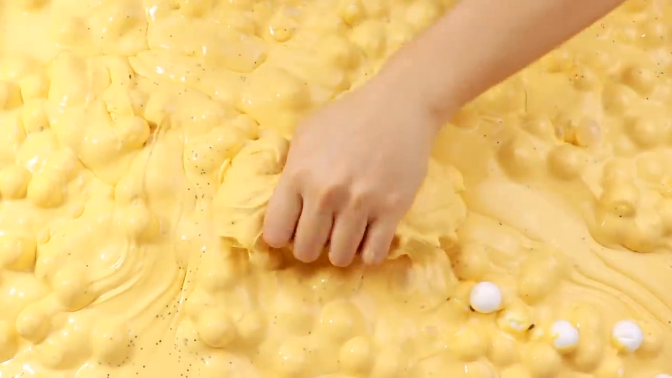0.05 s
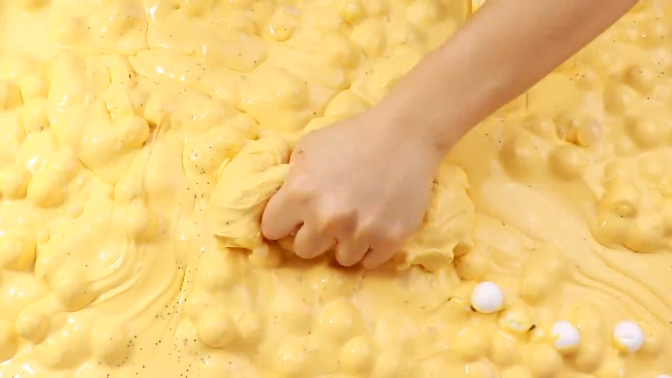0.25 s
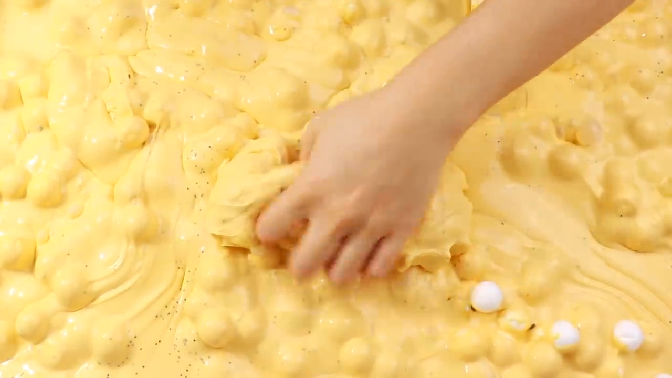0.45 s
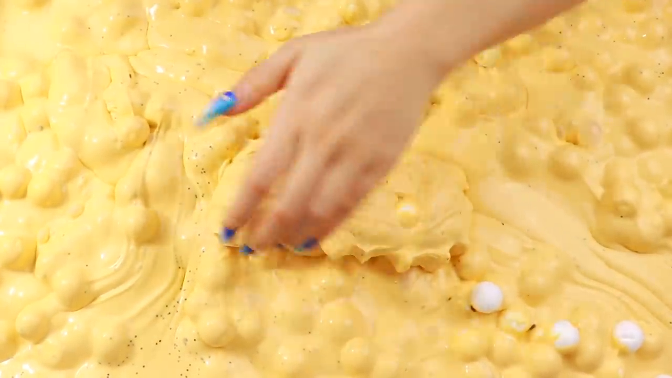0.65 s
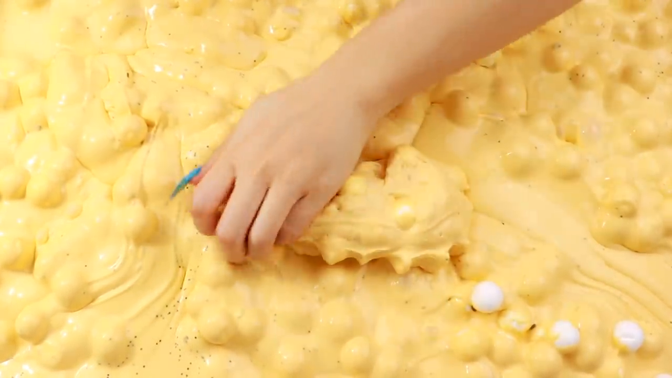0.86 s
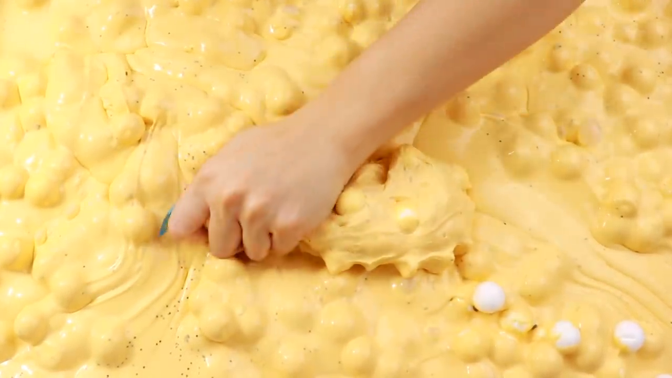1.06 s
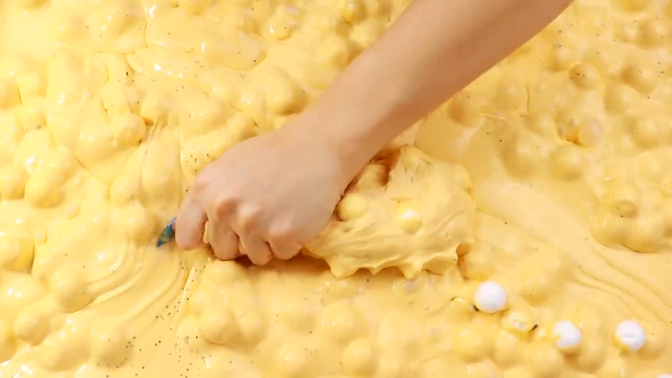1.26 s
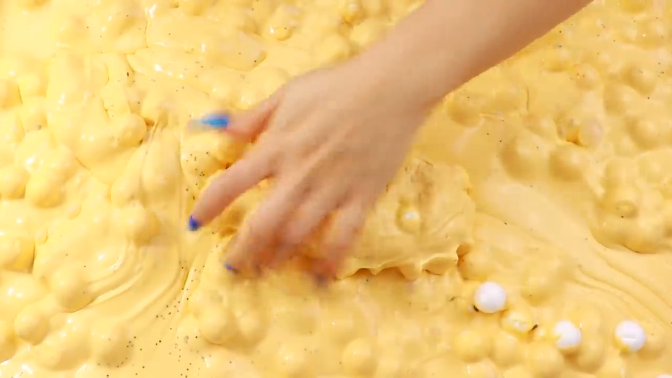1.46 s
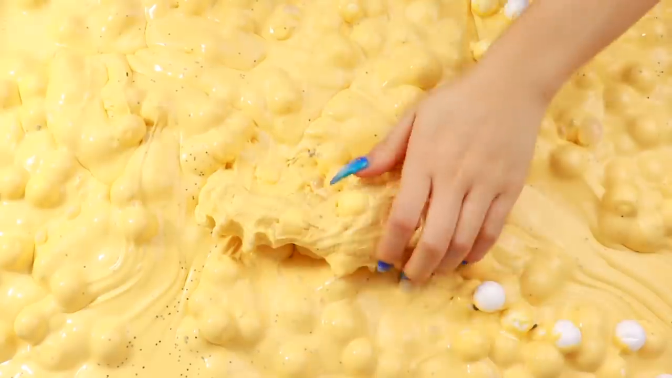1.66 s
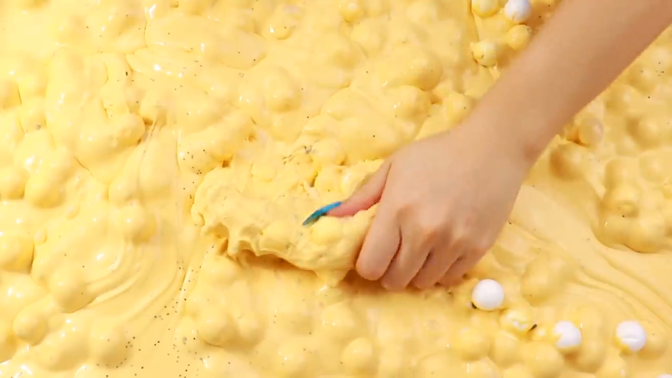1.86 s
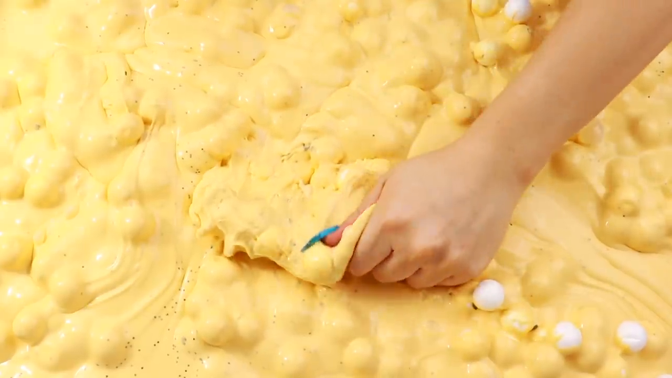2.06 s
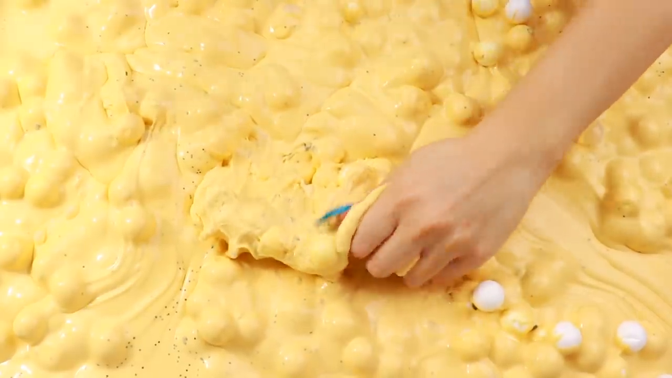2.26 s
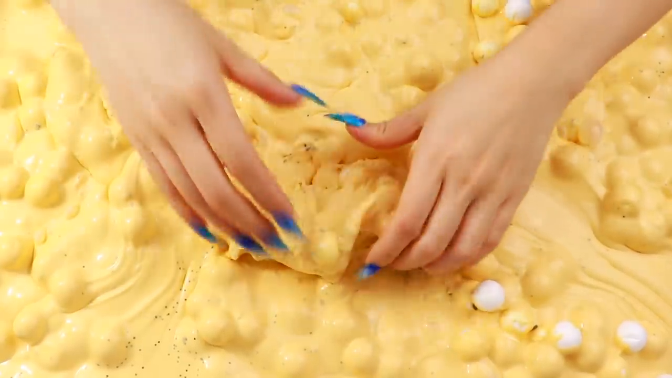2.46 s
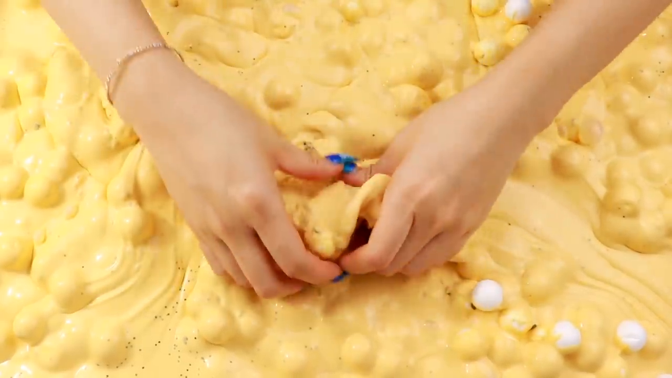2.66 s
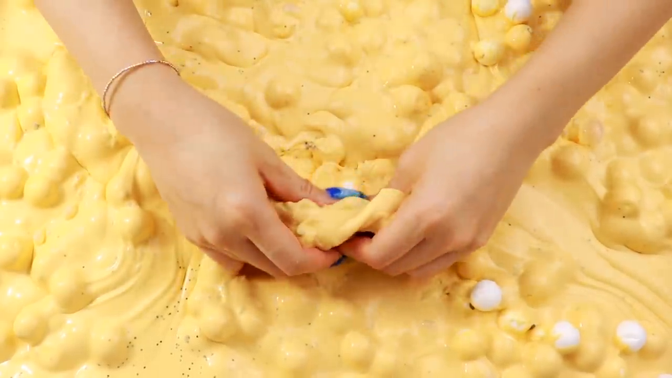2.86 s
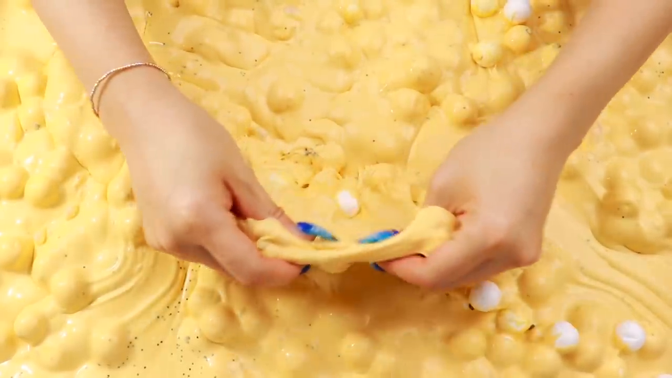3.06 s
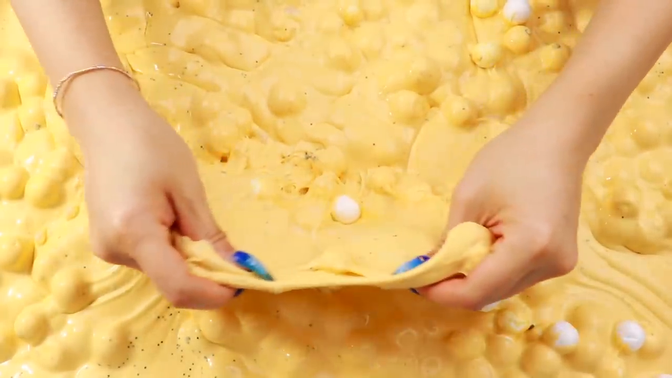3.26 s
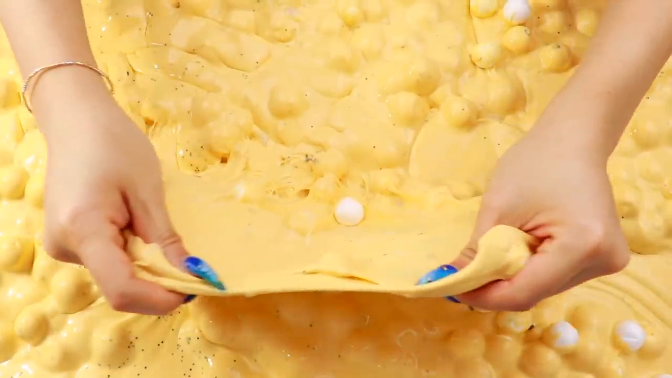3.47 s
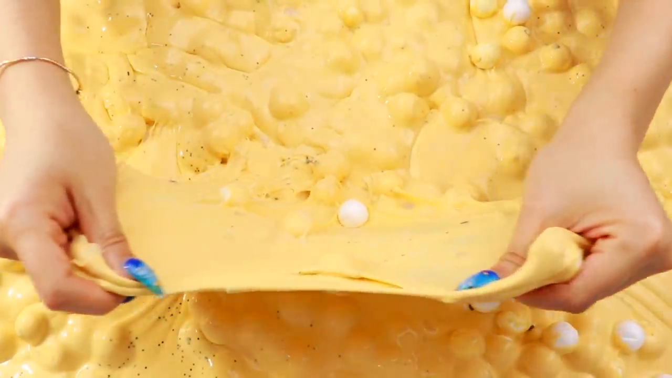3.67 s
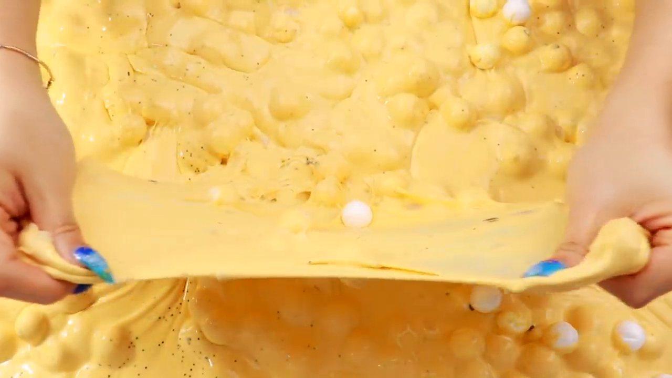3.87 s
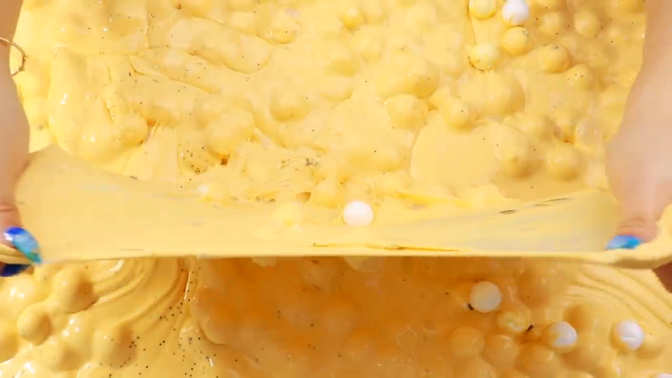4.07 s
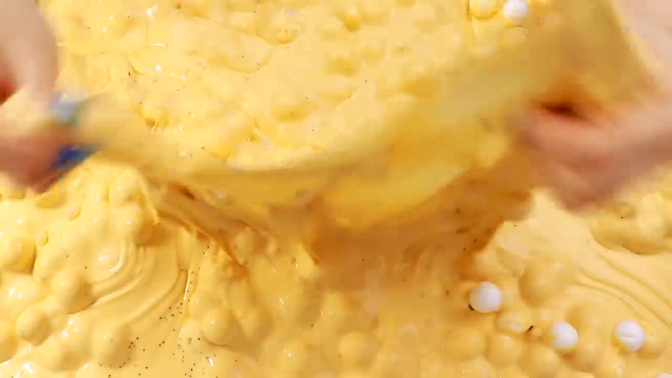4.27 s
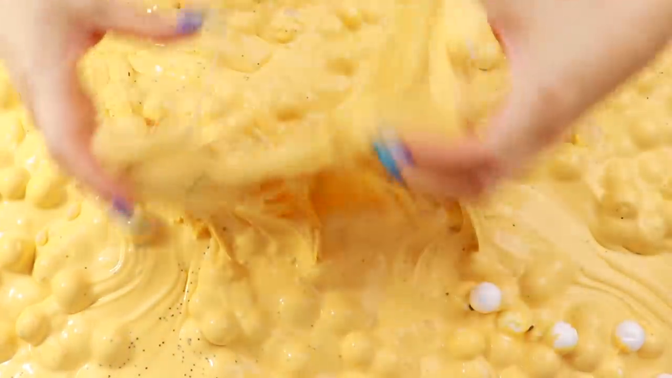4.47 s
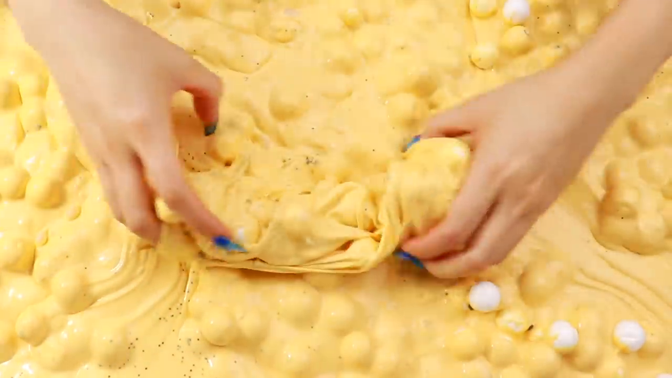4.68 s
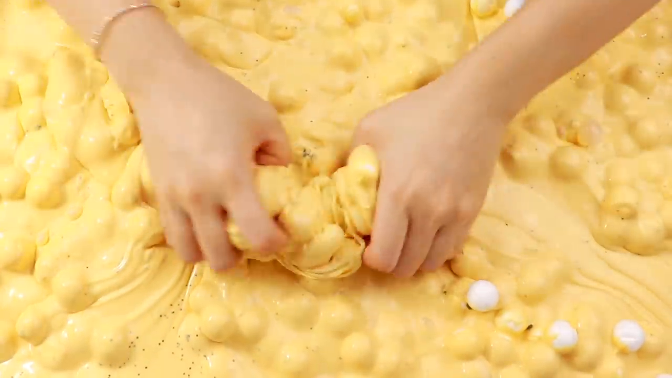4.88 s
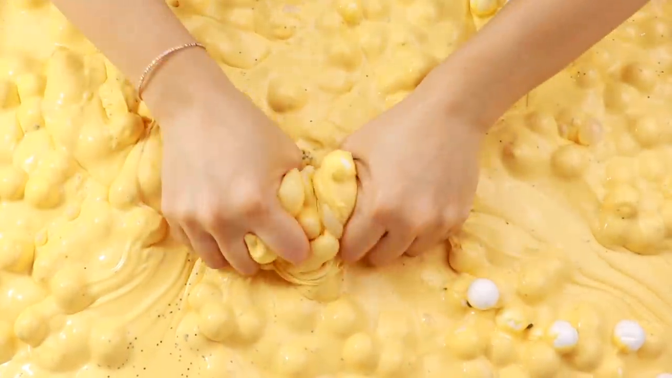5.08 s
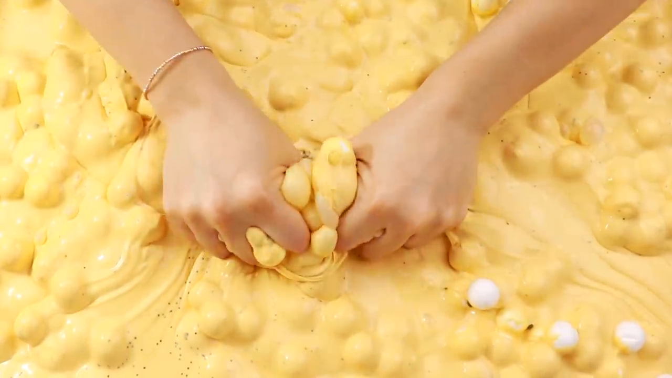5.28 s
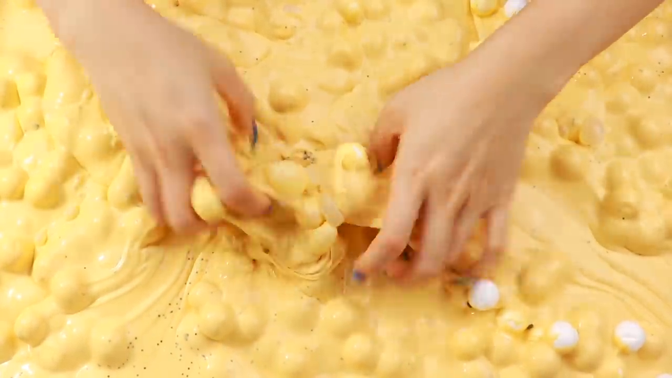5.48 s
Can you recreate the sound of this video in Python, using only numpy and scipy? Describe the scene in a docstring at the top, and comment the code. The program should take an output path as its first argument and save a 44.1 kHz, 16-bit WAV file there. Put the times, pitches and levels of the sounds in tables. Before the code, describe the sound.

Hands squeeze thick bead-filled slime close up: sharp irregular pops, wet squelching crackle, a quiet stretch, then another burst of crunchy popping.

```python
"""Small room, close microphone, table: hands squeeze, stretch and knead thick bead-filled slime.
Bursting air pockets: decaying noise through resonators. Squelch, fizz and peels: clumped grains ringing briefly.
Squeezed air squeaks as short rising tones; walls return a noise tail.
Low handling rumble, background noise and a wavering hum are shaped noise; a faint whine is a sine."""
import sys
import numpy as np
from scipy import signal
from scipy.fft import rfft, irfft, next_fast_len
from scipy.io import wavfile

SR = 44100
rng = np.random.default_rng(int(sys.argv[2]) if len(sys.argv) > 2 else 0)


def file_out(sig):
    """Save sig as 16-bit WAV at sys.argv[1]."""
    # one column per channel
    cols = np.atleast_2d(sig).T
    # limit, then scale
    lim = np.clip(cols, -1, 1)
    pcm = np.round(lim * 32767).astype(np.int16)
    wavfile.write(sys.argv[1], SR, pcm)


N = 243873
T_S = np.arange(N) / SR

# Hands gripping or pulling the mass: (start [s], end [s], coarse squelch level [dB], fine fizz level [dB])
GRIPS = [(0, 0.29, -49, -54), (0.84, 1.234, -53.5, -56), (1.733, 2.133, -52, -59.5),
         (2.563, 3.035, -55.5, -56), (3.21, 3.628, -67, -63.5), (3.823, 3.87, -78.5, -74),
         (4.336, 4.379, -74, -64.5), (4.48, 4.53, -59.5, -71), (4.7, 4.86, -59.5, -66),
         (4.887, 5.22, -45.5, -52)]
# Squelch spectrum: (frequency [Hz], relative gain [dB])
SQUELCH_SPECTRUM = [(150, -5), (400, -1), (1000, 5), (2000, 3.5), (3500, -2), (6000, -37.5)]
# Fizz spectrum: (frequency [Hz], relative gain [dB])
FIZZ_SPECTRUM = [(1200, -24.5), (2500, -6), (4000, -3), (7000, -3.5), (11000, -1.5), (16000, -2.5)]
# Air pockets bursting: (time [s], peak [dB], pocket pitch [Hz], length scale [ms], plop against pop [dB])
POPS = [(.0008, -8.5, 2310, 0.16, 28), (0.0143, -14, 12400, .35, -2), (0.0353, -6, 11100, 0.63, -10.5),
        (0.0427, -17, 5040, 0.36, -15), (0.0553, -19.5, 5500, 0.065, 13), (0.095, -10.5, 14000, .26, -37),
        (.101, -10, 10900, 0.78, -36), (.118, 1.5, 9900, 0.92, -7.5), (.1354, 4.5, 12400, 0.21, -5.5),
        (0.156, -13, 8000, .27, -21), (0.1607, 0, 7000, 0.34, -43), (.1667, -11, 5970, .3, -4),
        (0.1698, -15, 7000, 0.35, -14), (0.199, -10.5, 12980, 2.2, -5), (.2075, -15.5, 6660, 0.88, -11),
        (0.2347, 16.5, 8200, .63, -11.5), (0.265, 13, 7900, 0.57, -3.5), (0.2953, -27, 11000, 0.39, -24),
        (0.3893, -12.5, 3000, .18, -27), (0.4084, -12, 6300, 0.25, -26), (.425, -11, 2260, 0.6, -8.5),
        (.7054, -11.5, 5400, 0.19, -22.5), (.7219, -21.5, 3750, 0.11, -23), (0.724, -17.5, 9840, 0.22, -15),
        (0.7857, -30, 8400, .18, -26), (0.8574, -18.5, 3600, 0.61, -34), (0.8616, 4.5, 9300, 0.22, -9.5),
        (0.868, -5, 3400, .4, -28), (.8749, -2, 3550, 0.16, -19), (0.9043, -26, 1200, .8, -10.5),
        (0.919, -29, 1200, .8, -11), (.9506, -25.5, 1170, 0.87, -14), (.9637, -21, 2830, 0.44, -23),
        (0.9714, -11.5, 5550, 0.092, -6), (1.0039, -18, 1790, 1.3, 8), (1.0279, -12, 9620, 0.2, -3),
        (1.0376, -22.5, 11610, 0.13, -19.5), (1.048, -13, 9040, 0.14, -21), (1.0575, -5.5, 9250, 4.7, -25),
        (1.0591, -5.5, 12000, 2.6, 5.5), (1.0945, -28, 4240, 0.2, -14), (1.1072, -22, 13150, 1.1, -3),
        (1.1206, -15.5, 10400, .12, -22), (1.1411, -18.5, 13150, 0.46, -13), (1.171, 3.5, 9400, 1.4, -25.5),
        (1.2139, -20, 11400, 1, -23), (1.2744, -24.5, 9400, 0.22, -14), (1.3855, -26, 2930, 0.74, -24),
        (1.4022, -13.5, 1790, 0.59, -3.5), (1.695, -17, 1950, .2, 20.5), (1.7362, -19, 4300, .7, 1),
        (1.751, -17.5, 1690, 0.21, 1), (1.801, -10, 2720, 0.13, 7), (1.838, -19.5, 7950, 1.5, 0.5),
        (1.8671, -24, 870, 1.7, -22), (1.8846, -21, 4400, 0.11, 9), (1.9025, -20, 7360, .26, -8),
        (1.9415, 0, 10000, .15, -11.5), (1.9624, -6, 12350, 0.054, -37), (2.0032, 5, 6800, 0.56, -47),
        (2.1395, -8, 3600, 0.19, 4.5), (2.2798, -20.5, 8700, 0.4, -9), (2.304, -14, 10760, .12, -3.5),
        (2.5732, -21, 10370, 0.31, -25.5), (2.581, -32, 11200, .12, -23), (2.6064, -27, 13200, 1, -21),
        (2.6212, -18, 11610, 0.82, -4), (2.6433, -19.5, 4330, 0.27, 3), (2.6883, -17.5, 8350, 0.45, -12),
        (2.724, -24.5, 3960, 1.1, 19), (2.7633, -14, 3530, 0.07, -19), (2.7677, -18.5, 3700, 0.39, -3),
        (2.779, -23, 7260, 3.2, -11), (2.7899, -13.5, 8000, 2.9, -19), (2.872, -23.5, 8600, 3.9, -10),
        (2.9398, -24, 1500, 6.5, -1), (2.95, -19, 970, 1.9, -8), (2.9613, -14, 13400, 0.09, -32),
        (3.0271, -17.5, 11300, 1.07, -12.5), (3.1432, -28, 13400, 3.9, -22), (3.1541, -27, 7200, 2.1, -4),
        (3.287, -43.5, 3060, 2.1, -16), (3.325, -39, 6430, 0.81, -11), (3.406, -33, 1324, 0.54, -8.5),
        (3.471, -38, 1010, 0.9, -13), (3.4844, -33, 2950, 1.7, 21), (3.5062, -24, 2600, 0.25, -2),
        (3.573, -36, 4260, 2, -32), (3.617, -27, 8600, 0.37, -22), (3.6488, -43, 778, 1.5, -5),
        (3.72, -50, 2510, .5, -5), (3.826, -48.5, 4074, 1.3, -14.5), (3.9122, -43, 2565, 1.9, 0),
        (3.915, -47.5, 447, 2.1, -12), (4.003, -52, 650, 1.1, -6), (4.118, -53.5, 1795, 1, -1),
        (4.228, -34, 2670, 2.1, -22), (4.259, -29, 4960, 1, -17.5), (4.28, -25.5, 8700, 1.1, -28),
        (4.5248, -13, 13100, 1.07, -24), (4.6542, -45, 3260, 0.61, -11), (4.681, -39.5, 3340, 0.61, 11),
        (4.712, -36.5, 3700, 1.3, 6), (4.7298, -15.5, 6070, 0.39, -20), (4.755, -42, 1090, 2.7, 5),
        (4.79, -21, 790, 0.76, -3), (4.7978, -12, 10900, 0.11, -45), (4.816, -31, 3030, 2.2, 6),
        (4.8528, -29, 9040, 2.3, -21), (4.8757, 4.5, 2770, 1.83, -11), (4.9013, -8, 890, 1.1, 2),
        (4.9247, -5.5, 3570, 0.36, -15), (4.9552, -15.5, 1540, 1.1, 0), (4.9843, -18.5, 1100, 1.9, 1),
        (5.0, -14, 523, 0.42, -5.5), (5.0045, -16, 1850, 4.5, 3), (5.017, -10, 5700, 0.45, -15),
        (5.025, -6.5, 12100, 0.77, -38), (5.0352, -12.5, 3620, 0.71, -14), (5.083, -25, 10900, .8, -15),
        (5.093, -17.5, 8950, 0.38, 0), (5.1238, 0, 8650, 0.2, -12), (5.133, -15, 6250, .95, -2),
        (5.1393, -6.5, 2680, 0.22, -10), (5.1498, -10.5, 13900, 0.3, -9), (5.1815, 5, 3260, 1.64, -6.5),
        (5.2103, -19, 5480, 1.8, 24), (5.2269, -18, 2420, 1.6, 2), (5.2546, -18, 3680, 0.27, -43),
        (5.397, -25, 2240, 1.9, -1), (5.432, -21.5, 1070, 0.52, -4), (5.487, -11, 8700, 0.19, -9)]
# Wall echo decay: (frequency [Hz], T60 [s])
WALL_T60 = [(300, .2), (1500, .18), (4000, .21), (8000, .22), (15000, .14)]
# Wall echo strength: (frequency [Hz], relative level [dB])
WALL_RETURN = [(300, -13), (1500, -10), (3500, 0), (8000, 0), (15000, -3)]
# Handling through the table: (time [s], level [dB])
RUMBLE_LEVEL = [(0.0, -61.5), (0.28, -45.5), (0.38, -66.5), (0.48, -39), (0.58, -60), (0.91, -47),
                (1.02, -62), (1.05, -45), (1.32, -67), (1.45, -44.5), (2.22, -64), (2.39, -46),
                (3.79, -59.5), (5.16, -48), (5.27, -65), (5.53, -38)]
# Table rumble spectrum: (frequency [Hz], relative gain [dB])
RUMBLE_SPECTRUM = [(15, 6.5), (35, -7.5), (60, -7.5), (130, -23), (250, -38.5)]
# Room and microphone noise spectrum: (frequency [Hz], relative gain [dB])
HUSH_SPECTRUM = [(88, -31), (150, -1), (222, -8), (378, -4.5), (1360, -15.5), (3930, -20), (4690, -23),
                 (11400, -22.5), (15300, -21.5), (16500, -39.5)]
# Skin or a slack sheet peeling off: (start [s], end [s], wet body level [dB], bright rustle level [dB])
PEELS = [(0.368, 0.517, -36.5, -38), (1.33, 1.481, -39.5, -38), (2.221, 2.405, -42.5, -44.5),
         (3.102, 3.19, -45.5, -51), (4.174, 4.345, -60.5, -48.5), (5.336, 5.56, -37.5, -37)]
# Wet peel body spectrum: (frequency [Hz], relative gain [dB])
BODY_SPECTRUM = [(70, 6.5), (200, 8.5), (500, 0), (1000, 4), (2000, 2.5), (3500, -66), (6000, -49)]
# Bright peel rustle spectrum: (frequency [Hz], relative gain [dB])
RUSTLE_SPECTRUM = [(1200, -13), (2500, -2), (4000, -7.5), (7000, -7), (11000, -7), (16000, -13.5)]
# Air squeezed through a narrow gap: (start [s], end [s], first pitch [Hz], last pitch [Hz], level [dB])
SQUEAKS = [(1.8, 1.826, 4200, 5320, -53), (3.12, 3.17, 560, 630, -50)]

GRIP_RISE_DB_PER_S, GRIP_FALL_DB_PER_S = 197.5, 149.5
REST_DB = (-86.5, -80.5)  # squelch, fizz: the mass settling by itself
AFTER_DB, AFTER_T60_S = (-43.5, -40), 0.16  # squelch, fizz: torn walls crackle after a burst
AFTER_SHARE = 0.85  # share of the burst's dB passed to the crackle
HUSH_DB = -68.5
WHINE_HZ, WHINE_DB = 4000, -87
HUM_HZ, HUM_WIDTH_HZ, HUM_DB = 127, 6, -72.5
SWELL_DB = 10  # peel edges lie this far below its middle
TUG_S, TUG_DB, LAST_TUG_S = 0.0646, 2.5, 0.019  # period, depth, last tug crest before the end
CUTOFF_HZ = 16900


def from_db(db):
    """Decibels to amplitude."""
    return 10 ** (np.asarray(db) / 20)


def rms_one(x):
    """Scales x to rms 1."""
    return x / np.sqrt(np.mean(x ** 2) + 1e-20)


def at_hz(points, hz):
    """Reads a table along log frequency."""
    table_hz, values = np.transpose(points)
    return np.interp(np.log(hz), np.log(table_hz), values)


def coloured(x, spectrum):
    """Filters x by a spectrum that falls to -60 dB an octave beyond its ends; rms 1."""
    size = next_fast_len(N)
    hz = np.arange(1, size // 2 + 2) * SR / size
    below, above = (spectrum[0][0] / 2, -60), (spectrum[-1][0] * 2, -60)
    closed = [below] + list(spectrum) + [above]
    gain = from_db(at_hz(closed, hz))
    return rms_one(irfft(rfft(x, size) * gain, size)[:N])


def resonance(x, hz, width_hz):
    """Two-pole resonance, gain 1 on top."""
    r = np.exp(-np.pi * width_hz / SR)
    feed = np.array([1, 0, -1]) * (1 - r * r) / 2
    back = [1, -2 * r * np.cos(2 * np.pi * hz / SR), r * r]
    return signal.lfilter(feed, back, x)


def resonance_pair(x, hz, width_hz):
    """Two equal resonances in series, for steeper skirts."""
    return resonance(resonance(x, hz, width_hz), hz, width_hz)


def drift(rate_hz):
    """Slow random wander: noise under a double low-pass, rms 1."""
    settle = 9000
    r = np.exp(-2 * np.pi * rate_hz / SR)
    slow = signal.lfilter([1], [1, -2 * r, r * r], rng.standard_normal(N + settle))
    return rms_one(slow[settle:])


def grains(per_s, clump_db, low_hz, high_hz, cycles, smooth):
    """Tiny strands snap in clumps, each ringing a few cycles at its own pitch, over a smooth wet hiss."""
    sizes = from_db(5.5 * np.minimum(rng.exponential(1, N), 4)) * rng.choice([-1, 1], N)
    born = rng.random(N) < per_s * from_db(clump_db * drift(25)) / SR
    strikes = sizes * born
    pitch_index = rng.integers(0, 12, N)
    ringing = 0
    for k, hz in enumerate(np.geomspace(low_hz, high_hz, 12)):
        struck = strikes * (pitch_index == k) + 1e-18
        ringing = ringing + rms_one(resonance_pair(struck, hz, hz / cycles))
    wide_cracks = rms_one(strikes * (pitch_index < 2))  # some crack across all pitches
    snaps = rms_one(ringing) + 0.8 * wide_cracks
    hiss = rng.standard_normal(N) * from_db(1.9 * drift(40))
    return rms_one(snaps) + smooth * hiss


def tearing_gains():
    """Squelch and fizz gains follow the grip and flare after every burst."""
    bursts = np.zeros(N)
    for s, peak_db, *_ in POPS:
        bursts[round(s * SR)] = from_db(AFTER_SHARE * peak_db)
    flare = signal.lfilter([1], [1, -from_db(-60 / (AFTER_T60_S * SR))], bursts)
    gains = from_db(REST_DB)[:, None] + from_db(AFTER_DB)[:, None] * flare
    for start_s, end_s, *level_db in GRIPS:
        rise_db = GRIP_RISE_DB_PER_S * np.maximum(start_s - T_S, 0)
        fall_db = GRIP_FALL_DB_PER_S * np.maximum(T_S - end_s, 0)
        gains = gains + from_db(level_db)[:, None] * from_db(-rise_db - fall_db)
    return gains


def tearing():
    """The sticky mass tears: coarse grains squelch, fine grains fizz."""
    coarse_gain, fine_gain = tearing_gains()
    squelch = coloured(grains(600, 5.0, 303, 3000, cycles=1.82, smooth=0.21), SQUELCH_SPECTRUM)
    fizz = coloured(grains(1300, 5.0, 2500, 11000, cycles=2.5, smooth=0.22), FIZZ_SPECTRUM)
    return coarse_gain * squelch + fine_gain * fizz


def pops(sharpness, edge_db, breath, plop_hz, thud_db):
    """A film snaps and rushing air rings the pocket; a low plop and a jolt of the mass go with it."""
    size = 600
    out, t = np.zeros(N + size), np.arange(size) / SR
    air = rng.standard_normal((len(POPS), size))
    plop_spread = rng.uniform(-1, 1, len(POPS))
    thud = np.sin(np.pi * np.clip(t / 0.0013, 0, 1)) ** 2  # one 1.3 ms jolt
    for (s, peak_db, hz, ms, plop_db), rush, spread in zip(POPS, air, plop_spread):
        push = breath * rush * np.exp(-t / (0.0014 * ms))  # time constant is 1.4 times the length scale
        push[0] = 1 + ms  # the film lets go
        hz = min(hz, 0.4 * SR)
        pocket = resonance(resonance(push, hz, hz / sharpness), hz, hz / 0.5)
        # small, quick pockets crack wide
        snap_gain = from_db(edge_db) * (hz / 5000) ** 0.94 / (ms + 0.69)
        pop = pocket + snap_gain * push * np.exp(-t / 0.00036)
        low_hz = plop_hz * 2 ** (0.6 * spread)
        plop = resonance(resonance(push, low_hz, low_hz / 0.5), low_hz, low_hz / 0.15)
        low = plop / np.linalg.norm(plop) + from_db(thud_db) * thud
        pop = pop / np.linalg.norm(pop) + from_db(plop_db) * low
        at = round(s * SR)
        out[at:at + size] += from_db(peak_db) * pop / np.abs(pop).max()
    return out[:N]


def room(x):
    """Dense wall echoes: noise that fades in over 2 ms and dies band by band."""
    t, echo = np.arange(SR // 2) / SR, 0
    edges_hz = np.geomspace(200, 17000, 11)
    for low_hz, high_hz in zip(edges_hz, edges_hz[1:]):
        band_filter = signal.butter(2, [low_hz, high_hz], "band", fs=SR, output="sos")
        band = signal.sosfilt(band_filter, rng.standard_normal(len(t)))
        hz = np.sqrt(low_hz * high_hz)
        echo = echo + band * from_db(at_hz(WALL_RETURN, hz) - 60 * t / at_hz(WALL_T60, hz))
    near = from_db(18) * np.exp(-t / 0.0031)  # table and hands answer first and strongest
    echo = echo * (1 + near) * np.clip(t / 0.002, 0, 1)
    return signal.fftconvolve(x, echo / np.linalg.norm(echo))[:N]


def table_rumble():
    """Handling through the table: low noise in uneven nudges."""
    lumps = from_db(3.5 * drift(7))
    noise = coloured(rng.standard_normal(N), RUMBLE_SPECTRUM)
    time_s, level_db = np.transpose(RUMBLE_LEVEL)
    return from_db(np.interp(T_S, time_s, level_db)) * rms_one(lumps * noise)


def hush():
    """Room and microphone noise: steady shaped noise."""
    return from_db(HUSH_DB) * coloured(rng.standard_normal(N), HUSH_SPECTRUM)


def whine():
    """A faint steady electronic tone: one sine, level as rms."""
    return np.sqrt(2) * from_db(WHINE_DB) * np.sin(2 * np.pi * WHINE_HZ * T_S)


def hum():
    """A faint low hum that wavers: noise through a narrow resonance."""
    narrow = resonance_pair(rng.standard_normal(N), HUM_HZ, HUM_WIDTH_HZ)
    return from_db(HUM_DB) * rms_one(narrow)


def peels():
    """Many strands let go at once in stick-slip tugs: a lumpy rustle that swells and stops short."""
    body = coloured(grains(800, 1.0, 325, 4170, cycles=1.75, smooth=1.0), BODY_SPECTRUM)
    rustle = coloured(grains(3000, 2.7, 1740, 14230, cycles=2.9, smooth=1.0), RUSTLE_SPECTRUM)
    out = 0
    for start_s, end_s, body_db, rustle_db in PEELS:
        pulling = np.clip((T_S - start_s) / 0.043, 0, 1) * np.clip((end_s - T_S) / 0.024, 0, 1)
        along = np.clip((T_S - start_s) / (end_s - start_s), 0, 1)
        swell_db = SWELL_DB * (np.sin(np.pi * along) - 1)
        tugs_db = TUG_DB * np.cos(2 * np.pi * (end_s - LAST_TUG_S - T_S) / TUG_S)
        strands = from_db(body_db) * body + from_db(rustle_db) * rustle
        out = out + pulling * from_db(swell_db + tugs_db) * strands
    return out


def squeaks(overtone_db):
    """A fluttering slit: a rising tone with a strong second harmonic."""
    out = 0
    for start_s, end_s, first_hz, last_hz, level_db in SQUEAKS:
        along = np.clip((T_S - start_s) / (end_s - start_s), 0, 1)
        phase = 2 * np.pi * np.cumsum(first_hz + (last_hz - first_hz) * along) / SR
        tone = np.sin(phase) + from_db(overtone_db) * np.sin(2 * phase)
        out = out + np.sin(np.pi * along) * from_db(level_db) * tone
    return out


def scene():
    """Slime in the room, over table rumble and background noise."""
    torn = tearing()
    bursts = pops(sharpness=2.53, edge_db=-13, breath=0.97, plop_hz=1200, thud_db=-27)
    rumble = table_rumble()
    background = hush() + whine() + hum()
    slime = torn + bursts + peels() + squeaks(overtone_db=-1.5)
    return (slime + from_db(-10) * room(slime) + rumble + background)[None]


def record(dry):
    """The loudest pops overload the input and clip; the top is cut."""
    top_cut = signal.cheby2(18, 80, CUTOFF_HZ, fs=SR, output="sos")
    return signal.sosfilt(top_cut, np.clip(dry, -0.7, 0.7))


dry = scene()
out = record(dry)
file_out(out)
```